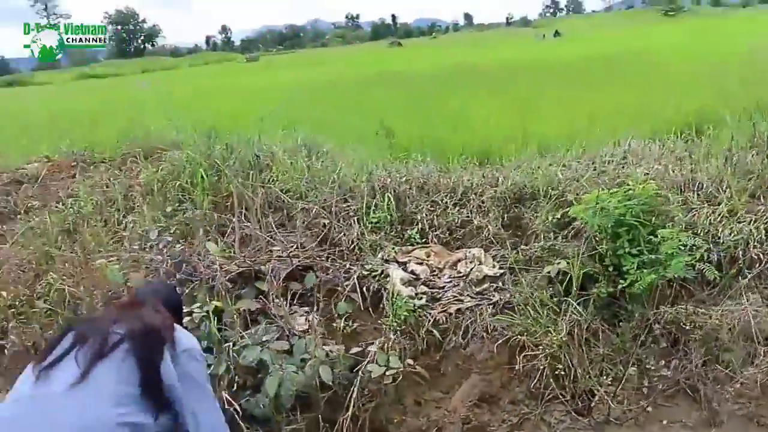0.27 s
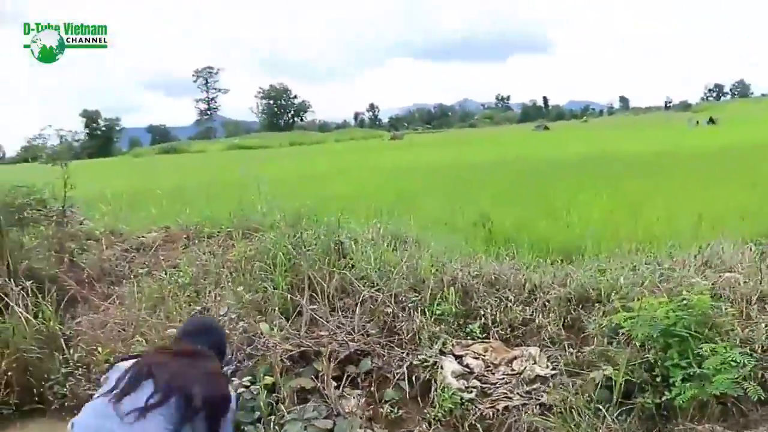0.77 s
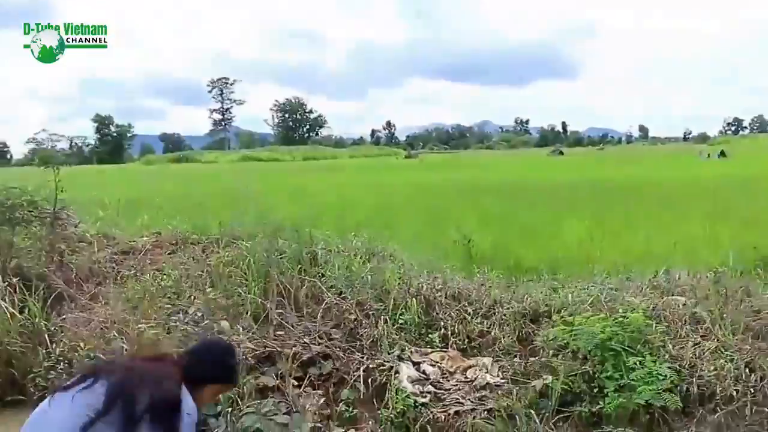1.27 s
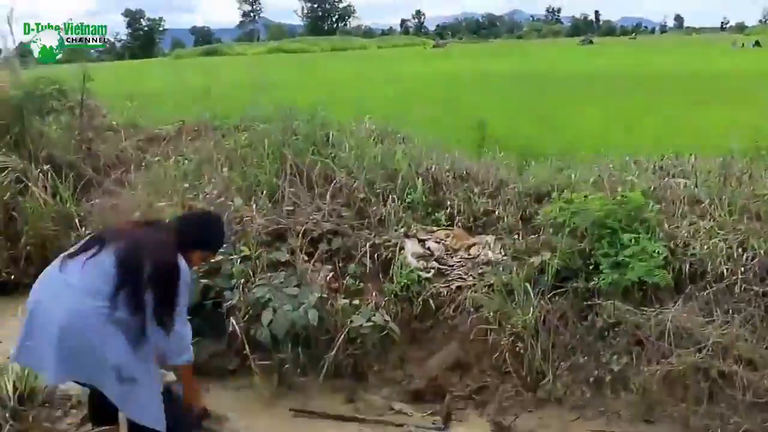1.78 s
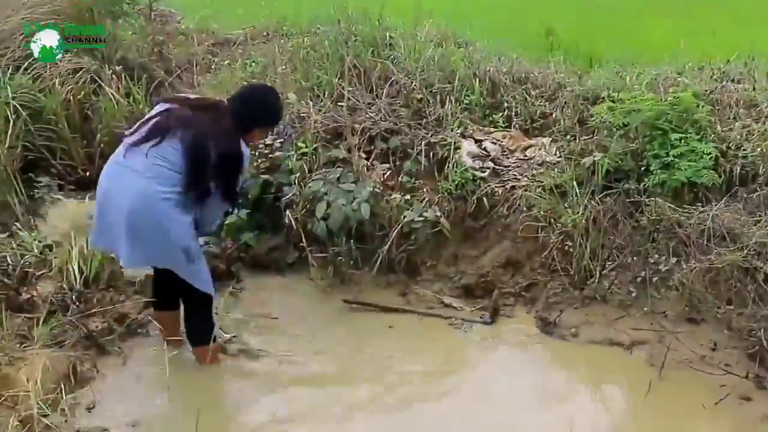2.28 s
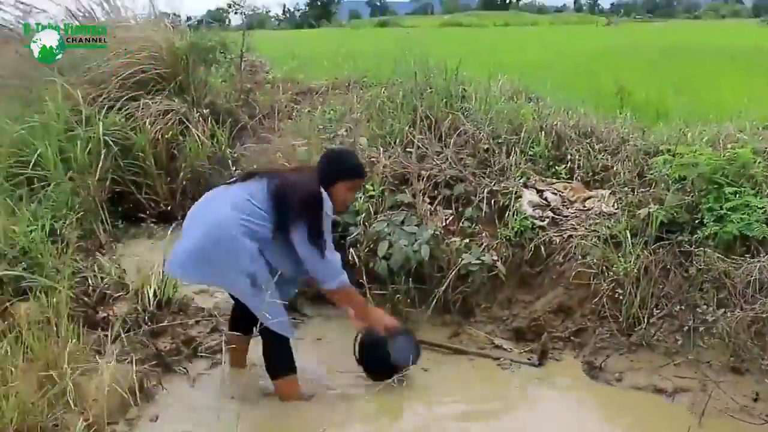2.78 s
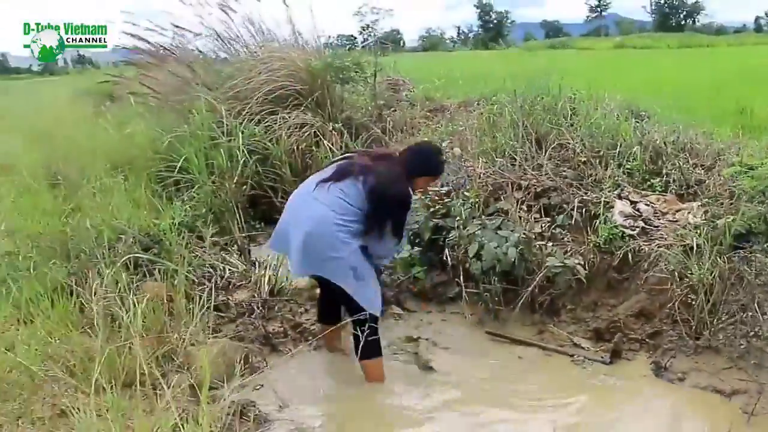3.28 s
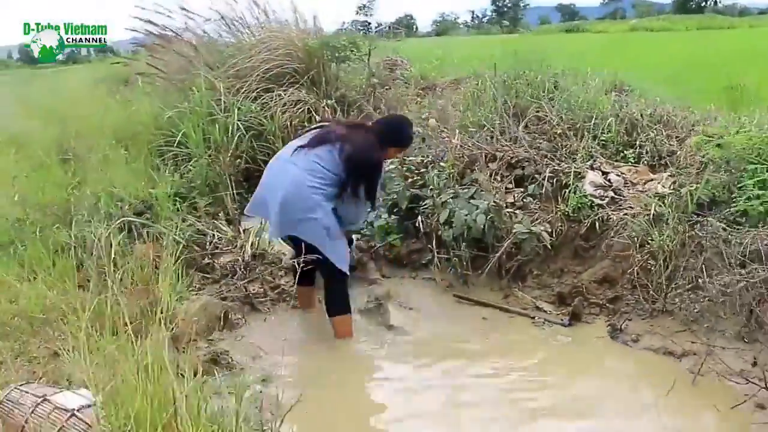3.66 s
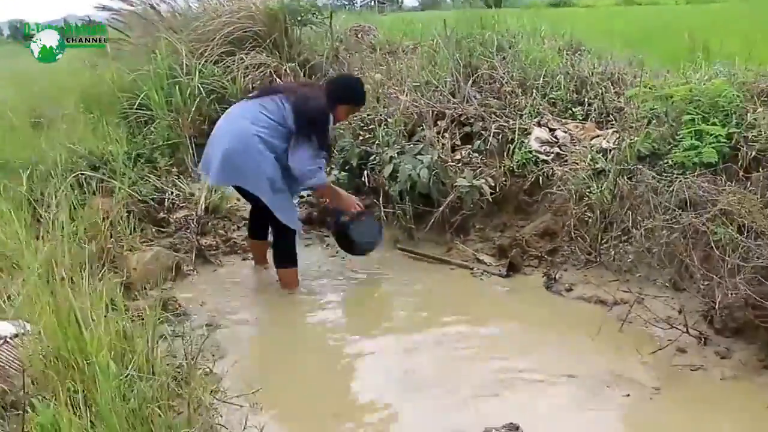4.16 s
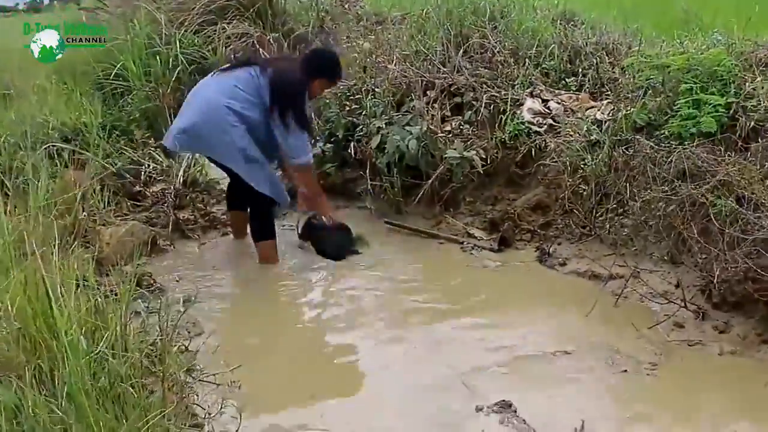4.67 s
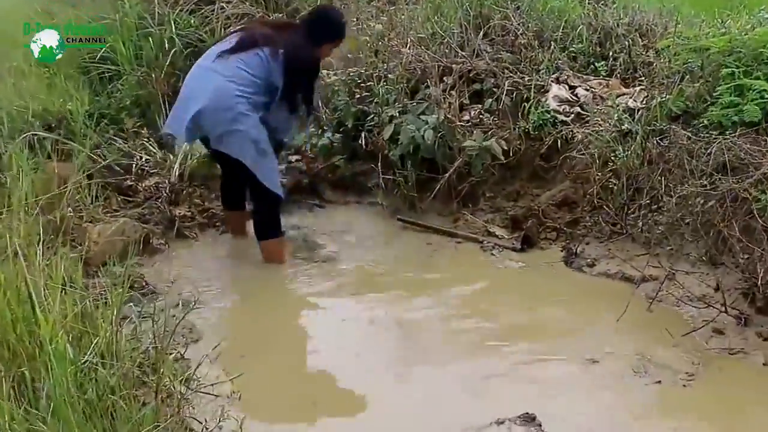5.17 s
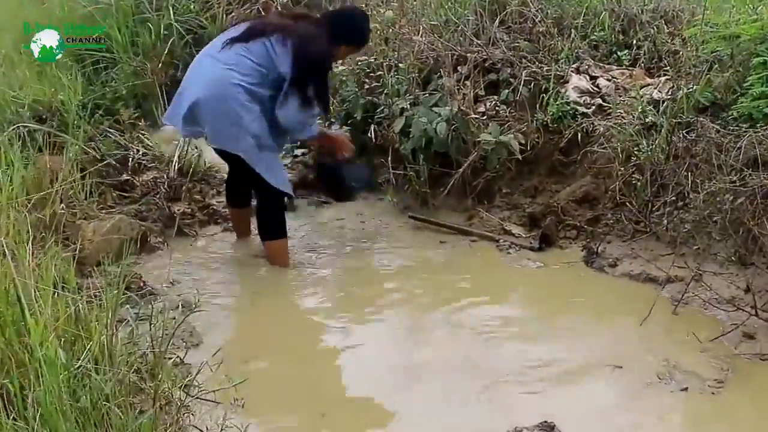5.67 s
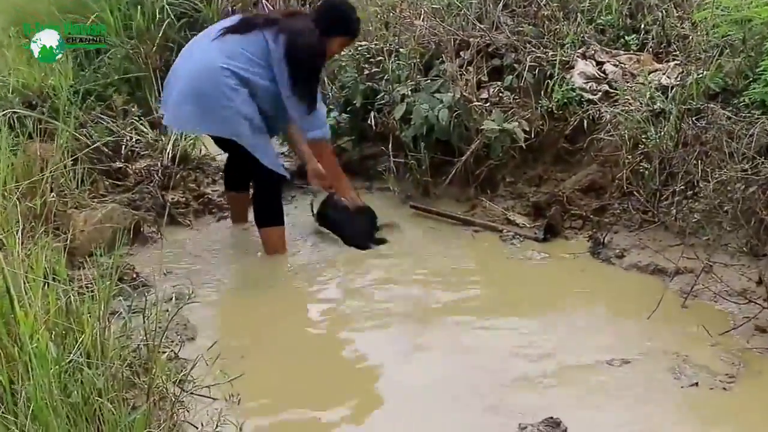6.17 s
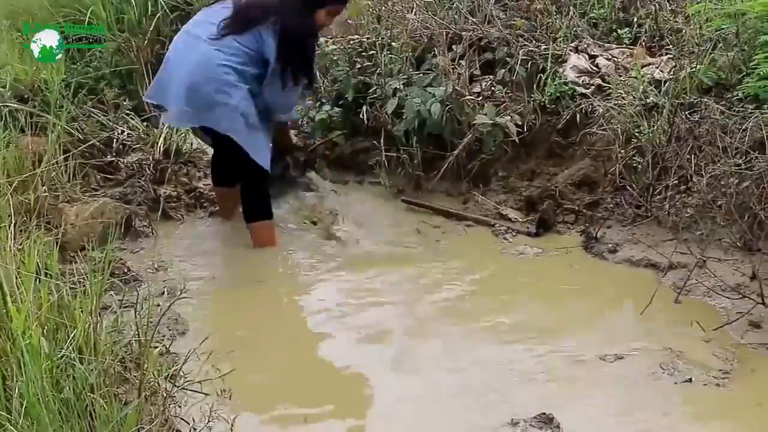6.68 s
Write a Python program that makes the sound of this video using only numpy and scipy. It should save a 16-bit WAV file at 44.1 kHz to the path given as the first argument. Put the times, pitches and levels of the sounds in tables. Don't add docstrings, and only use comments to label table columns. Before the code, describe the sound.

Quick, wet bucketfuls splash into a muddy pool without a break, roughly one every third of a second. Deep sloshes and round air-pocket gulps mix with fizzing bubbles, light spray, drips and running water. A few tiny bright ticks sound like drops hitting the bucket. Thin bird whistles come from nearby grass. Open air, no echo; wind thuds and rumbles separately on left and right of the stereo microphone, often masking the water.

```python
import sys
import numpy as np
from scipy import signal
from scipy.fft import rfft, irfft, next_fast_len
from scipy.io import wavfile
from scipy.ndimage import uniform_filter1d, map_coordinates

SR = 44100
rng = np.random.default_rng(int(sys.argv[2]) if len(sys.argv) > 2 else 0)


def pcm_store(signal):
    levels = np.round(np.clip(np.atleast_2d(signal), -1, 1) * 32767)
    wavfile.write(sys.argv[1], SR, levels.astype(np.int16).T)


def volts(x):
    e = np.asarray(x, float) / 20
    return 10 ** e


N = 305613

# start in seconds, length in seconds, place of the crest from 0 to 1,
# fizz level in dB, slosh in dB over the fizz.
THROWS = [(0.126, 0.051, 0.14, -33, 15.5), (0.493, 0.033, 0.91, -25.5, 11), (0.846, 0.095, 0.4, -41, 16),
          (1.248, 0.039, 0.6, -27.5, 18), (1.613, 0.049, 0.56, -28, 15), (1.942, 0.084, 0.58, -31.5, 6.5),
          (2.342, 0.036, 0.78, -27, 12), (2.723, 0.037, 0.23, -28.5, 12.5), (3.064, 0.027, 0.86, -25, 9.5),
          (3.393, 0.083, 0.47, -37, 11), (4.16, 0.029, 0.92, -28.5, 12.5), (4.538, 0.03, 0.46, -30, 14.5),
          (4.9, 0.05, 0.68, -27, 12.5), (5.287, 0.03, 0.94, -27.5, 16.5), (5.656, 0.039, 0.71, -28.5, 13.5),
          (6.039, 0.051, 0.41, -31.5, -2), (6.394, 0.056, 0.8, -33, 10), (6.792, 0.048, 0.47, -33, 8)]
# start in seconds, length in seconds, fizz level in dB,
# slosh in dB over the fizz.
DIPS = [(0.095, 0.037, -35.5, 8), (0.426, 0.048, -42.5, 14), (1.766, 0.033, -40.5, 16.5),
        (1.895, 0.051, -38, 13.5), (2.156, 0.016, -38, -5), (2.953, 0.015, -49, 4), (4.097, 0.02, -53, -10),
        (4.237, 0.016, -41, 5), (4.638, 0.025, -38.5, -10), (4.776, 0.03, -38, -7), (5.497, 0.035, -41, 13),
        (5.623, 0.036, -38, 18), (5.703, 0.03, -41.5, 14), (5.823, 0.015, -34.5, 9.5),
        (6.085, 0.021, -40, 12), (6.205, 0.11, -37, -11), (0.135, 0.03, -43, 16), (0.018, 0.054, -49, 17),
        (3.783, 0.048, -54, 24), (5.286, 0.024, -32, 4), (5.865, 0.024, -39, -8), (2.344, 0.028, -32, 4),
        (0.539, 0.034, -41.5, 17), (0.267, 0.012, -39, 9), (0.35, 0.027, -43, 12), (0.609, 0.014, -34, 16),
        (0.694, 0.018, -34.5, 0), (0.803, 0.11, -37, 12), (1.022, 0.082, -37.5, 3), (1.144, 0.12, -36, 7.5),
        (1.439, 0.02, -30, 11), (2.082, 0.012, -33.5, 5), (2.17, 0.01, -41.5, 17), (2.52, 0.062, -33, -10),
        (2.818, 0.05, -33, 7.5), (2.883, 0.057, -31.5, -17), (3.004, 0.019, -41, 12),
        (3.17, 0.012, -26.5, -4), (3.259, 0.051, -32.5, -11), (3.605, 0.071, -40, -13),
        (4.258, 0.043, -37.5, -18.5), (4.318, 0.1, -38, -1), (4.431, 0.036, -38, 0), (4.715, 0.08, -32, -1),
        (5.025, 0.018, -34.5, 8.5), (5.104, 0.073, -36, -20), (5.393, 0.02, -33, -13),
        (5.456, 0.075, -30.5, -4), (5.765, 0.032, -38.5, 15.5), (5.87, 0.06, -35, -18),
        (6.158, 0.03, -30.5, 5), (6.56, 0.014, -32.5, 11.5), (6.613, 0.061, -35, -15)]
# time in seconds, flow in dB, fineness of the drops in dB.
RUNOFF = [(0.0, -40.5, -4.5), (0.11, -36, 2), (0.3, -38, -6.5), (0.49, -37, -2), (0.9, -39, -8.5),
          (1.35, -41, -3.5), (1.57, -35.5, -0.5), (2.0, -38, -9.5), (2.25, -35, -3), (2.55, -38, -5),
          (3.38, -36, -3), (3.77, -47, -1), (4.32, -40, -6.5), (4.99, -37.5, -4), (5.64, -39.5, -6),
          (6.27, -36.5, -2.5), (6.75, -37, -3), (6.93, -39.5, -14)]
# pitch in Hz, level in dB per Hz.
SLOSH_COLOUR = [(150, -2.5), (300, -1.5), (520, -11), (700, -0.5), (880, -4.5), (1010, -3.5), (1150, -22.5),
                (2000, -34)]
# pitch in Hz, level in dB per Hz.
FIZZ_COLOUR = [(500, -71), (900, -16), (1200, -13.5), (2000, -10.5), (3200, -9), (4500, -13.5), (6000, -19),
               (9000, -30.5)]
# pitch in Hz, level in dB per Hz.
SPRAY_COLOUR = [(3000, -39), (4500, -10), (6000, -4), (8000, -2), (11000, -7), (14000, -11), (15500, -24)]
# time in seconds, peak in dB, pitch in Hz.
GULPS = [(0.127, -1.5, 342), (0.528, -4, 1176), (0.875, -11.5, 380), (1.268, -6.5, 850),
         (1.424, -13.5, 1000), (1.632, -13.5, 416), (1.774, -17, 754), (2.0, -8.5, 358),
         (2.362, -11.5, 620), (2.724, -7, 1290), (2.827, -11.5, 576), (3.072, -12, 390), (3.173, -12, 337),
         (3.442, -4.5, 630), (4.183, -6, 315), (4.535, -2, 373), (4.923, -7, 655), (4.937, -4, 386),
         (5.302, -7, 427), (5.311, -4.5, 380), (5.315, -10.5, 665), (5.498, -13, 585), (5.627, -11.5, 855),
         (5.676, -2, 428), (5.766, -11.5, 382), (5.67, -10, 1010), (6.163, -13.5, 377), (6.436, -17, 410),
         (6.628, -19, 640), (6.565, -23, 1310)]
# time in seconds, peak in dB, pitch in Hz.
DROPS = [(0.095, -21, 1540), (0.248, -24.5, 1430), (0.365, -27, 1530), (0.672, -27, 1040),
         (1.005, -28, 1750), (1.261, -17, 750), (2.554, -22.5, 830), (2.885, -21, 1990), (2.957, -22, 650),
         (3.013, -21, 610), (3.08, -15, 596), (3.173, -20, 1310), (3.882, -29, 587), (4.061, -32, 684),
         (4.155, -29, 695), (4.235, -25, 2180), (4.515, -21.5, 593), (4.723, -24, 2100), (5.016, -42, 1030),
         (5.083, -31, 1390), (5.514, -26, 1600), (5.823, -26, 1720), (6.214, -20, 1930)]
# time in seconds, peak in dB, pitch in Hz.
TICKS = [
    (2.2368, -19, 4600),
    (4.9932, -13, 4100),
    (5.0847, -14, 3200),
    (6.2148, -22, 2000),
]
# pitch in Hz, likeness from 0 to 1.
ALIKE = [(300, 1), (1000, 0.9), (2000, 0.88), (4000, 0.35), (8000, 0.4), (15000, 0.24)]
# pitch in Hz, lead in radians.
LEAD = [(0, 0.5), (500, 0), (1200, -0.55), (2240, -0.85), (4740, -1.98), (14200, -1.5), (16000, -3)]
# time in seconds, share of the airy top lost.
STEP_BACK = [
    (2.75, 0),
    (3.0, 0.62),
    (3.45, 0.3),
    (3.7, 0.45),
    (4.15, 0.35),
]
# time in seconds, peak in dB, start in Hz, end in Hz, length in seconds.
HIGH_BIRD = [(1.883, -28.5, 7660, 7300, 0.013), (2.157, -24.5, 8000, 7100, 0.0071),
             (2.202, -35.5, 7850, 7600, 0.0089), (2.452, -29.5, 7700, 7400, 0.007),
             (2.475, -31, 7800, 7300, 0.009), (2.495, -28.5, 8000, 7100, 0.0085),
             (2.86, -33, 7900, 6900, 0.026), (3.181, -32, 7900, 7130, 0.015),
             (3.486, -34.5, 7500, 7050, 0.021), (3.62, -42, 7000, 7640, 0.017),
             (3.816, -44, 7260, 7000, 0.0099), (3.876, -39, 7500, 7250, 0.009),
             (5.183, -38, 7500, 7200, .015)]
# time in seconds, peak in dB, start in Hz, end in Hz, length in seconds.
LOW_BIRD = [(3.258, -30, 4100, 4300, 0.011), (3.589, -38, 3350, 4070, 0.025),
            (3.75, -43, 3550, 4150, 0.018), (3.771, -48, 4150, 3250, .013), (3.917, -41, 3250, 4100, 0.024),
            (3.946, -41, 3950, 3300, .01), (3.957, -41, 3750, 4150, .011),
            (4.093, -30.5, 2600, 3280, 0.005), (4.1, -37, 4200, 3270, 0.016),
            (4.268, -36, 4200, 3180, 0.011), (4.435, -35, 4200, 3300, 0.013),
            (4.602, -36, 4000, 2250, 0.018), (4.78, -32.5, 4100, 2550, 0.016),
            (4.954, -34, 4200, 3020, 0.018), (5.125, -33, 3980, 3020, .015), (5.541, -34, 3900, 3480, .009),
            (5.553, -32, 3480, 3900, 0.013), (5.711, -35.5, 3380, 4080, 0.024)]
# time in seconds, left port in dB, right port in dB.
BREEZE = [(0.0, -67, -69), (0.4, -50, -61), (0.7, -35.5, -35), (0.9, -45.5, -56), (1.15, -28, -43),
          (1.45, -31, -52), (1.8, -40, -40.5), (2.4, -41, -45), (2.8, -31.5, -35.5), (3.05, -23.5, -25),
          (3.3, -40, -46), (3.6, -19.5, -23.5), (3.95, -34, -42.5), (4.35, -28.5, -24.5), (4.7, -41, -30),
          (5.45, -42, -46.5), (5.75, -55, -56), (6.6, -43, -48), (6.93, -19.5, -40)]
# start in seconds, length in seconds, level in dB.
GUSTS_LEFT = [(0.503, 0.057, -18), (0.604, 0.043, -21.5), (1.012, 0.013, -17.5), (1.108, 0.016, -21),
              (1.191, 0.014, -10), (1.266, 0.059, -11.5), (1.521, 0.026, -17), (1.659, 0.023, -24),
              (1.973, 0.061, -23.5), (2.09, 0.14, -19), (2.574, 0.099, -12), (2.695, 0.017, -11),
              (2.929, 0.068, -10), (2.987, 0.028, -10), (3.064, 0.025, -11.5), (3.133, 0.03, -17),
              (3.362, 0.052, -19), (3.48, 0.017, -16.5), (3.51, 0.042, -16.5), (3.655, 0.02, -16.5),
              (3.729, 0.065, -14.5), (3.807, 0.023, -16), (3.868, 0.045, -15), (4.029, 0.065, -11.5),
              (4.11, 0.056, -11.5), (4.475, 0.14, -13), (4.849, 0.036, -15), (5.364, 0.061, -15.5),
              (6.724, 0.08, -18), (6.86, 0.011, -11)]
# start in seconds, length in seconds, level in dB.
GUSTS_RIGHT = [(1.316, 0.075, -28), (1.996, 0.033, -25), (2.558, 0.085, -17), (2.601, 0.011, -17),
               (2.648, 0.051, -17), (2.95, 0.082, -13.5), (3.047, 0.027, -26), (3.086, 0.044, -15),
               (3.16, 0.036, -19.5), (3.376, 0.076, -24.5), (3.476, 0.0067, -7), (3.507, 0.064, -16),
               (3.645, 0.024, -16), (3.729, 0.12, -14.5), (3.88, 0.015, -19.5), (3.98, 0.035, -19.5),
               (4.048, 0.068, -20), (4.253, 0.038, -23), (4.439, 0.033, -11), (4.488, 0.026, -10.5),
               (4.594, 0.06, -13.5), (4.64, 0.15, -16.5), (4.754, 0.018, -22), (4.802, 0.048, -16),
               (4.992, 0.076, -22.5), (5.084, 0.13, -21), (6.488, 0.049, -26.5), (6.585, 0.053, -23.5),
               (6.777, 0.014, -13.5)]
# time in seconds, peak in dB, pitch in Hz, left over right in dB.
PUSHES = [(0.506, -28.5, 205, -1), (0.608, -16, 121, 14), (0.87, -34, 374, 2.0), (1.015, -17.5, 125, 18.5),
          (1.111, -14.5, 169, 25), (1.195, -25, 187, 16.5), (1.243, -8, 183, 21), (1.397, -17.5, 135, 19),
          (1.431, -16.5, 107, 27), (1.532, -15.5, 149, 16), (1.663, -17, 157, 25), (1.991, -16, 136, 5.5),
          (2.073, -16.5, 148, 3), (2.189, -11, 100, 24), (2.352, -22, 271, 3), (2.571, -12, 98, 6),
          (2.606, -7, 119, 15), (2.951, -35, 420, 8.0), (2.951, -4.5, 278, 10), (3.069, -25, 131, 16),
          (3.168, -18, 248, 2), (3.484, -18, 162, -6), (3.51, -16, 186, -4), (3.572, -30, 124, -4),
          (3.635, -12, 160, 10), (3.733, -10.5, 155, 1), (3.876, -16, 261, 5), (4.037, -18, 92.5, 13.0),
          (4.069, -10, 174, -3), (4.119, -8, 172, 7), (4.177, -22, 304, 0), (4.425, -9, 205, 4),
          (4.486, -7, 191, -1), (4.598, -15, 182, -2), (4.682, -9, 227, -26), (4.756, -5, 240, -22.0),
          (4.807, -29, 156, -20), (4.854, -17, 207, -11), (4.921, -26, 361, 1), (5.306, -17, 403, 3),
          (5.369, -19, 165, 16.5), (5.669, -15, 410, -3), (5.76, -31, 360, 1.0), (6.163, -19, 168, -2),
          (6.434, -30, 398, 0), (6.728, -8, 144, 25), (6.863, -14, 358, 18.5), (6.864, -8, 207, 17),
          (3.487, -15, 300, 2.5), (3.516, -13, 240, 6), (3.532, -10, 334, 5), (3.541, -13, 380, 0),
                (3.577, -12, 300, -2), (3.602, -10.5, 425, 4), (3.64, -9, 335, 5.5), (3.725, -17, 330, 2),
                (3.755, -15, 280, 4), (3.816, -15.5, 380, 9), (3.882, -16.5, 450, 3), (4.518, -5, 286, 7),
                (4.536, -16, 377, 3), (4.63, -10.5, 261, -15.5)]
# pitch in Hz, level in dB per Hz.
BUFFET_COLOUR = [(40, -44), (90, 9.5), (160, 12), (260, 1.5), (400, -15.5), (550, -21.5), (900, -27),
                 (1500, -84)]
# pitch in Hz, level in dB.
SNAP_COLOUR = [(100, -70), (250, 3.5), (700, -2.5), (1200, -23), (2500, -50)]
# pitch in Hz, level in dB per Hz.
RUMBLE_COLOUR = [(15, -32), (30, 1.5), (70, 10.5), (110, 9), (200, -47)]

LULL_S, LULL_DB, REFILL_S, REFILL_DB, SWELL_S = 0.053, -6.5, 0.319, 0, 0.011
SLOSH_DB, SLOSH_PAUSES, SLOSH_THINS, SPRAY_DB, SPRAY_PAUSES = -4.5, 1, 0.43, -7, 0.83
BUCKET_HZ, BUCKET_WIDE_HZ, BUCKET_DB = 1028, 86, -4.5
AIR_HZ = 9700


def water():
    flutter = volts(1.49 * wobble(45) + 1.24 * np.array([wobble(70), wobble(70), wobble(30)]))
    low, middle, high = np.sqrt(effort()) * flutter
    near, scattered = low * slosh() + middle * fizz() + high * volts(2.5 * wobble(75)) * spray()
    near = filtered(near, bucket_hum)

    def spread(hz):
        angle = np.arccos(np.clip(along(ALIKE, hz), -1, 1)) / 2
        return np.array([np.cos(angle), np.sin(angle)])

    mid, side = filtered(np.array([near, scattered]), spread)
    splashes = np.array([mid + side, mid - side])
    return splashes + gulps() + ticks() + drops() + volts(-7.5) * middle * plinks()


def effort():
    flow_db, fine_db = curves(RUNOFF)
    pause_db = pause()
    slosh_db = SLOSH_DB - SLOSH_THINS * fine_db + SLOSH_PAUSES * pause_db
    spray_db = SPRAY_DB + fine_db + SPRAY_PAUSES * pause_db
    steady_db = flow_db + np.array([slosh_db, pause_db, spray_db])
    s, length, crest, db, low_db = np.transpose(THROWS)
    throws = [humps(zip(s, length, crest, db + over), stretch=1.476, sharp=2.88)
              for over in (low_db - 7.5, 1.5, -8.5)]
    s, length, db, low_db = np.transpose(DIPS)
    crest = np.full(len(s), 0.37)
    dips = [humps(zip(s, length, crest, db + over), stretch=1.086, sharp=0.62)
            for over in (low_db - 7.0, -0.6, -10.5)]
    ragged = volts(2 * 1.8 * wobble(220))
    finer = volts(2 * np.outer([0, 0, 0.28], fine_db))
    return volts(2 * steady_db) + np.add(throws, dips) * finer * ragged / ragged.mean()


def pause():
    start, length = np.transpose(THROWS)[:2]
    end = start + length
    middle = end - length / 2
    times = np.array([start - SWELL_S, end, middle + LULL_S, middle + REFILL_S]).T
    levels_db = np.tile([0, 0, LULL_DB, REFILL_DB], len(start))
    return np.interp(np.arange(N) / SR, np.sort(times.ravel()), levels_db)


def slosh():
    bubbles = bubbly(SLOSH_COLOUR, 0.74, count=3000, size=500, hz=645.0, spread=0.407,
                     cycles=1.55, rise=0.021, scatter_db=3.0)
    return even(patchy(bubbles, 1.6), seconds=0.073, share=0.32)


def fizz():
    bubbles = bubbly(FIZZ_COLOUR, 0.59, count=7000, size=360, hz=2058, spread=0.4683,
                     cycles=6.8, rise=0.059, scatter_db=2.5)
    return patchy(bubbles, 0.69)


def spray():
    bubbles = bubbly(SPRAY_COLOUR, 0.89, count=10000, size=48, hz=7000, spread=0.36,
                     cycles=3.5, rise=0.12, scatter_db=6.0)
    return patchy(bubbles, 2.6)


def bucket_hum(hz):
    width = 1j * hz * BUCKET_WIDE_HZ
    return 1 + volts(BUCKET_DB) * width / (BUCKET_HZ ** 2 - hz * hz + width)


def gulps():
    out, t = np.zeros(N + SR), np.arange(SR // 10) / SR
    froth = unit(filtered(rng.standard_normal(N),
                          lambda hz: 1 / (1 + (hz / 1500) ** 2) / (1 + (350 / (hz + 1)) ** 2)))
    for (s, db, hz), chance in zip(GULPS, rng.random((len(GULPS), 4))):
        slap = np.exp(-((t - .009) / 0.0051) ** 2) * froth[int(s * SR):][:len(t)]
        add_at(out, s - .006, volts(db - 20.5) * slap)
        age = t * (hz / 450) ** 0.49
        shape = volts(-60 * age / 0.024) * (1 - np.exp(-age / 0.0027))
        pockets = [(0, 3, .96),
                   (0.00208 + 0.00264 * chance[0], -7, 1.33 + 0.5 * chance[1]),
                   (0.00669 + 0.00642 * chance[2], -8, 0.836 + 0.41 * chance[3])]
        for late, part_db, ratio in pockets:
            ring = np.sin(2 * np.pi * ratio * hz * t * (1 + 3 * t))
            add_at(out, s + late, volts(db + part_db) * shape * ring)
    return out[:N]


def drops():
    out, t = np.zeros(N + SR), np.arange(SR // 20) / SR
    for s, db, hz in DROPS:
        age = t * hz / 4.85
        ring = np.sin(2 * np.pi * hz * t * (.95 + 0.036 * age))
        add_at(out, s, volts(db - 2.5) * 2 * age * np.exp(1 - 2 * age) * ring)
    return out[:N]


def plinks():
    return grains(count=800, size=500, hz=1906, spread=0.4545, cycles=7.9, rise=0.091, scatter_db=1.0)


def ticks():
    out, t = np.zeros(N + SR), np.arange(SR // 20) / SR
    shape = volts(-60 * t / .016) * (1 - np.exp(-t / .0003))
    for s, db, hz in TICKS:
        ring = sum(np.sin(2 * np.pi * ratio * hz * t) for ratio in (.7, .84, .95, 1.05, 1.17, 1.3))
        add_at(out, s, volts(db - 8) * ring * shape)
    return out[:N]


def birds():
    out = np.zeros(N)
    for s, db, start_hz, end_hz, length in HIGH_BIRD + LOW_BIRD:
        u = np.linspace(0, 1, int(length * SR))
        phase = 2 * np.pi * np.cumsum(start_hz + (end_hz - start_hz) * u) / SR
        add_at(out, s, volts(db) * np.abs(np.sin(np.pi * u)) ** .6 * np.sin(phase))
    leaves = volts(-60 * np.arange(600) / SR / 0.04) * rng.standard_normal(600)
    scattered = signal.fftconvolve(out, leaves / np.linalg.norm(leaves))[:N]
    return volts(-1.5 + 2.5 * wobble(240)) * (out + volts(-4) * scattered)


def wind():
    breeze_db = np.array(curves(BREEZE))
    gusts = [humps([(s, length, .45, db) for s, length, db in port], stretch=1.22, sharp=0.99)
             for port in (GUSTS_LEFT, GUSTS_RIGHT)]
    strength = np.sqrt(volts(2 * (breeze_db + 5.5)) + gusts)
    rumble = coloured_noise(RUMBLE_COLOUR)
    sharp = strength ** 1.894 * volts(0.5) * snaps()
    return pushes() + volts(-2.0) * strength * buffet() + sharp + volts(0.56 * breeze_db - 13.5) * rumble


def pushes():
    out, t = np.zeros((2, N + SR)), np.arange(SR // 10) / SR
    for s, db, hz, pan_db in PUSHES:
        age = t * hz / 1.58
        wave = 2 * age * np.exp(1 - 2 * age) * np.sin(2 * np.pi * hz * t)
        left = 1 / (1 + volts(-2 * pan_db))
        sign = np.sign(rng.standard_normal(2))
        ports = sign * np.sqrt([left, 1 - left])
        add_at(out, s, volts(db + 0.1) * ports[:, None] * wave)
    return out[:, :N]


def buffet():
    eddies = np.array([grains(count=1200, size=500, hz=205.2, spread=0.38, cycles=1.0, rise=0, scatter_db=4.5)
                       for port in "LR"])
    rush = coloured_noise(BUFFET_COLOUR)
    eddies = filtered(eddies, lambda hz: volts(np.minimum(along(BUFFET_COLOUR, hz) + 14, 0)))
    lumps = volts(6.0 * np.array([wobble(40), wobble(40)]))
    return even(lumps * (0.56 * rush + 0.89 * eddies), seconds=0.0328, share=0.72)


def snaps():
    eddies = np.array([grains(count=900, size=200, hz=542, spread=0.47, cycles=0.6, rise=0, scatter_db=0.0)
                       for port in "LR"])
    return filtered(even(eddies, seconds=0.038, share=0.92), lambda hz: volts(along(SNAP_COLOUR, hz)))


def bubbly(colour, noise_share, **swarm):
    noise = coloured_noise(colour)
    swarms = np.array([grains(**swarm), grains(**swarm)])
    beads = unit(filtered(swarms, lambda hz: volts(np.minimum(along(colour, hz) + 12, 0))))
    return np.sqrt(noise_share) * noise + np.sqrt(1 - noise_share) * beads


def grains(count, size, hz, spread, cycles, rise, scatter_db):
    u, g = rng.random((count, 3)), rng.standard_normal((count, 1))
    pitch = np.minimum(hz * np.exp(spread * g), SR / 4)
    turns = pitch * np.arange(size) / SR
    age = turns / cycles
    wave = np.sin(2 * np.pi * turns * (1 + rise * age / 2)) * age * np.exp(-2 * age)
    wave *= volts(-scatter_db * np.log(u[:, 1:2] + 0.001)) * np.sign(u[:, 2:] - .5)
    at = (u[:, :1] * N).astype(int) + np.arange(size)
    return unit(np.bincount(at.ravel(), wave.ravel(), N + size)[:N])


def humps(rows, stretch, sharp):
    power = np.zeros(N + SR)
    for s, length, crest, db in rows:
        u = np.linspace(0, 1, int(stretch * length * SR) + 2)
        start_s = max(s - (stretch - 1) / 2 * length, 0)
        add_at(power, start_s, volts(2 * db) * np.minimum(u / crest, (1 - u) / (1 - crest)) ** sharp)
    return power[:N]


def patchy(x, depth_db):
    z = signal.stft(x, nperseg=256)[2]
    field = rng.standard_normal(z.shape[1:])
    field = uniform_filter1d(uniform_filter1d(field, size=3, axis=0), size=9, axis=1)
    gain = volts(depth_db * field / field.std())
    return unit(signal.istft(z * gain, nperseg=256)[1][:, :N])


def even(x, seconds, share):
    power = np.abs(uniform_filter1d(x ** 2, int(seconds * SR), axis=-1)) + 1e-3
    return unit(x / power ** (share / 2))


def coloured_noise(colour):
    return unit(filtered(rng.standard_normal((2, N)), lambda hz: volts(along(colour, hz))))


def filtered(x, response):
    m = next_fast_len(N + 8192)
    return irfft(rfft(x, m) * response(np.fft.rfftfreq(m, 1 / SR)), m)[..., :N]


def wobble(rate):
    return map_coordinates(rng.standard_normal(2000), [np.arange(N) * rate / SR])


def curves(rows):
    s, *cols = np.transpose(rows)
    return [np.interp(np.arange(N) / SR, s, c) for c in cols]


def along(points, hz):
    f, v = np.transpose(points)
    return np.interp(np.log(hz + 1), np.log(f + 1), v)


def add_at(out, s, wave):
    start = int(s * SR)
    out[..., start:start + wave.shape[-1]] += wave


def unit(x):
    return x / np.sqrt(np.mean(x ** 2, axis=-1, keepdims=True) + 1e-20)


def scene():
    half_turn = np.array([[.5j], [-.5j]])
    airborne = filtered(water() * volts([[.3], [-.3]]) + birds(),
                        lambda hz: np.exp(half_turn * np.interp(hz, *np.transpose(LEAD))))
    top = filtered(airborne, lambda hz: 1 / (1 + (AIR_HZ / (hz + 1)) ** 8))
    return airborne - curves(STEP_BACK)[0] * top + wind()


def low_pass(x):
    return signal.sosfilt(signal.butter(12, 15750, fs=SR, output="sos"), x)


def record(dry):
    soft = dry / (1 + np.abs(dry) ** 4) ** (1 / 4)
    cut = filtered(soft, lambda hz: hz < 15435)
    return low_pass(cut)


dry = scene()
out = record(dry)
pcm_store(out)
```